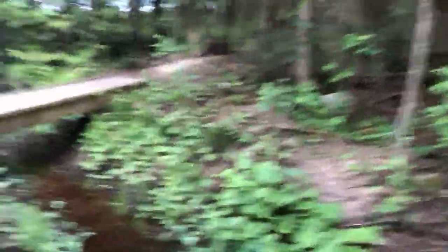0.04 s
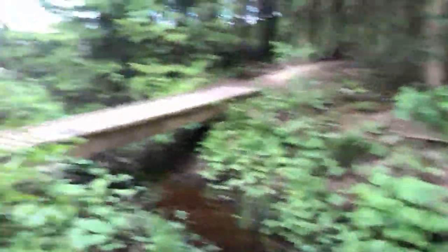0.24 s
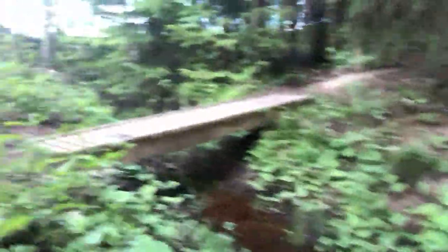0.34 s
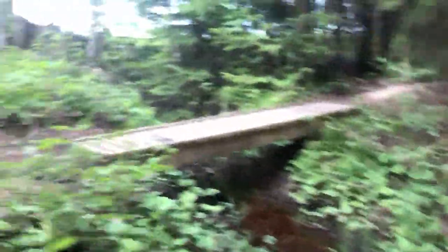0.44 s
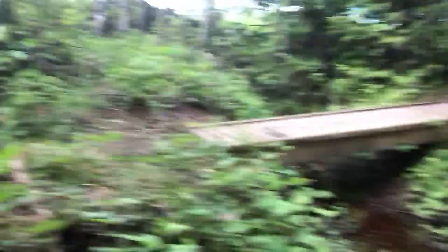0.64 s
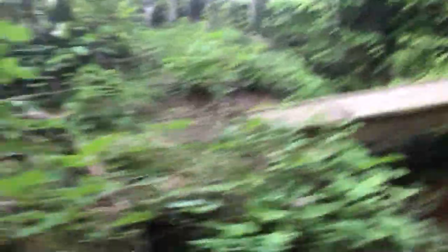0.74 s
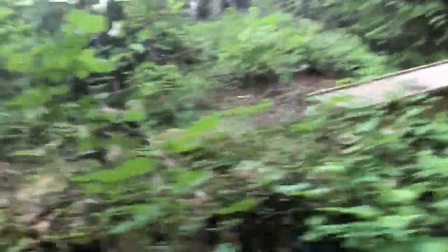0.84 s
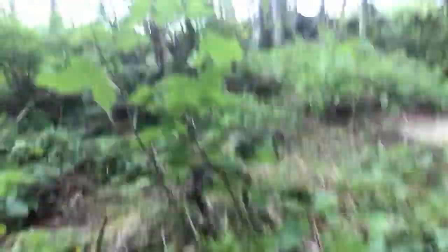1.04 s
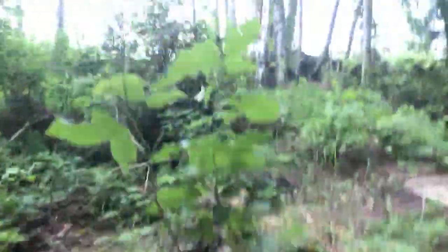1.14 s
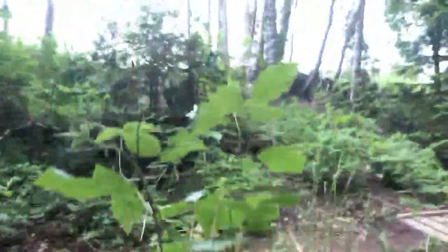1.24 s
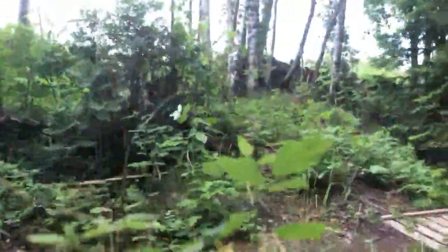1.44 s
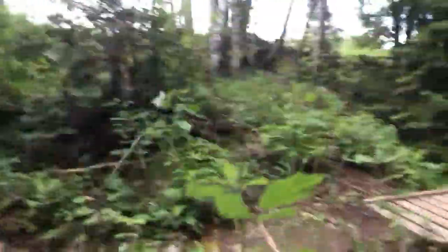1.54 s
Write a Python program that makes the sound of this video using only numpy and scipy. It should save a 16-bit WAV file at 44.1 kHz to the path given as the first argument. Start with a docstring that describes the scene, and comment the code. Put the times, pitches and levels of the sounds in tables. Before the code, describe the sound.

Foliage rustle close up: dry snaps, swishing fronds and soft bumps on a quiet forest path

```python
"""Pushing through ferns

A walker pushes quickly through ferns and undergrowth on a forest path, close to a phone microphone.
A quiet forest hush and a low rumble are shaped noise; fronds swish and rustle as patchy, crackling noise.
Soft bumps thud and bent stems knock: short waves with a falling pitch, roughened by noise.
Dry stalks and leaf edges snap as very short bursts of noise, each with its own tone colour."""
import sys
import numpy as np
from scipy import signal
from scipy.fft import rfft, irfft, next_fast_len
from scipy.io import wavfile
from scipy.ndimage import uniform_filter1d

SR = 44100
rng = np.random.default_rng(int(sys.argv[2]) if len(sys.argv) > 2 else 0)


def to_wav(sig):
    """Store sig (one row per channel, or 1-D mono) as 16-bit WAV at the path in sys.argv[1].

    Samples outside -1..1 are clipped; the rate is SR.
    """
    pcm = np.clip(np.atleast_2d(sig), -1, 1) * 32767
    pcm = np.round(pcm).astype(np.int16)
    wavfile.write(sys.argv[1], SR, pcm.T)  # frames by channels


N = 70560  # length in samples: 1.6 s

# All levels below are those of the sounds before they reach the microphone.
# A decay time is the time a sound takes to fade by 60 dB.

# Tone of the forest hush: (f/Hz, gain/dB)
HUSH_TONE = [(71, -42), (120, 4.5), (304, -5.5), (1360, -3.5), (1560, -4), (2800, -1), (4650, 0.5),
             (15000, -13.5)]
HUSH_LEVEL_DB = -65

# Low rumble of the walking body at the microphone, over time: (t/s, level/dB)
RUMBLE_LEVELS = [(0.0, -64), (0.052, -69), (0.288, -61), (0.31, -71), (0.512, -81), (0.556, -74.5),
                 (0.672, -72.5), (0.796, -66), (0.98, -69), (1.024, -59.5), (1.216, -71.5), (1.282, -58.5),
                 (1.358, -79), (1.39, -67), (1.478, -76), (1.6, -79)]
RUMBLE_HZ = 81  # the rumble gets weaker well below and above this

# Fronds dragging on the legs, over time: (t/s, treble swish level/dB, low rustle level/dB)
FROND_DRAG = [(0, -62.5, -53), (0.059, -70, -67.5), (.12, -60.5, -58.5), (.17, -55.5, -61),
              (0.194, -56.5, -51), (.225, -51.5, -58.5), (.25, -38.5, -45.5), (.29, -40, -51.5),
              (.33, -47.5, -54.5), (.385, -56, -59), (.5, -63.5, -65.5), (.55, -57, -58.5),
              (.63, -63, -64.5), (0.702, -67, -65), (0.742, -57, -51.5), (0.758, -64, -72.5),
              (0.789, -49.5, -50), (0.849, -56.5, -55.5), (.89, -48, -48), (0.961, -54.5, -62),
              (1.02, -44.5, -50), (1.068, -53.5, -51.5), (1.108, -54.5, -59), (1.139, -53, -47.5),
              (1.19, -64, -62.5), (1.251, -58.5, -57), (1.311, -53, -55), (1.366, -54, -66),
              (1.401, -51.5, -54.5), (1.47, -54.5, -63), (1.52, -63, -61), (1.6, -56, -64)]
# Tone of the treble swish: (f/Hz, gain/dB)
SWISH_TONE = [(1470, -9), (2500, -14), (3030, -6.5), (5530, -0.5), (6460, -3.5), (9060, -4), (14500, -5.5)]
# Tone of the low rustle: (f/Hz, gain/dB)
RUSTLE_TONE = [(88, -39), (150, -12), (303, -4), (525, -6), (588, -7), (867, -5.5), (1230, -9.5),
               (1600, -4), (3000, -11.5), (3900, -43), (6600, -120)]

# Soft low bumps of foot and stems: (t/s, peak level/dB, first f/Hz, decay time/s)
THUDS = [(0.084, -48.5, 262, 0.052), (0.151, -53.5, 392, 0.038), (0.244, -73, 456, 0.043),
         (0.263, -49, 157, 0.031), (0.359, -59, 403, 0.045), (0.736, -48, 386, 0.071),
         (0.774, -39, 465, 0.026), (0.864, -49, 338, 0.045), (0.935, -45, 320, 0.017),
         (0.989, -67, 390, 0.037), (1.022, -52, 388, 0.046), (1.049, -45.5, 334, 0.05),
         (1.063, -55, 293, 0.073), (1.088, -51, 414, 0.14), (1.139, -50, 256, 0.04),
         (1.209, -60, 310, 0.071), (1.283, -46.5, 362, 0.076), (1.295, -40, 238, 0.017),
         (1.384, -51, 151, 0.073), (1.449, -52, 437, 0.036), (1.528, -58, 346, 0.05),
         (1.578, -59, 188, 0.076)]
THUD_RISE_S, THUD_HALF_PITCH_S = 0.0013, 0.03
THUD_ROUGHNESS = 0.51  # noise strength beside a wave of height 1

# Knocks of bent stems: (t/s, peak level/dB, first f/Hz, time to half pitch/s, decay time/s)
STEM_KNOCKS = [(0.0849, -51, 2320, 0.0014, 0.016), (0.091, -44.5, 2440, 0.0013, 0.036),
               (0.183, -36.5, 1230, 0.022, 0.0085), (0.2354, -31, 1830, 0.018, 0.0096),
               (0.2615, -29.5, 1916.0, 0.045, 0.011), (0.271, -38, 2340, 0.0016, 0.014),
               (0.3175, -41, 2220, 0.0013, 0.017), (0.3565, -40.5, 2280, 0.0013, 0.017),
               (0.5301, -54, 2420, 0.0013, 0.015), (0.5469, -42, 2290, 0.0016, 0.016),
               (0.6762, -49.5, 2360, 0.0017, 0.018), (0.7257, -48, 2230, 0.00093, 0.026),
               (0.7343, -43.4, 2350, 0.0016, 0.0167), (0.7679, -30.5, 2270, 0.0011, 0.013),
               (0.7741, -31.5, 2350, 0.0015, 0.0085), (0.7876, -37, 2340, 0.0011, 0.014),
               (0.8059, -34.5, 2270, 0.00099, 0.014), (0.8218, -37, 2002.0, 0.023, 0.0079),
               (0.8637, -37.5, 2230, 0.00099, 0.026), (0.9234, -40, 1730, 0.026, 0.009),
               (0.9352, -44, 2290, 0.00124, 0.044), (0.9873, -40, 1894.0, 0.014, 0.018),
               (1.129, -39, 2290, 0.0011, 0.014), (1.1411, -37.5, 2310, 0.0015, 0.021),
               (1.1434, -31, 1937.0, 0.031, 0.0065), (1.2022, -46.5, 2270, 0.0011, 0.019),
               (1.2808, -32.5, 2294, 0.0019, 0.018), (1.2926, -40, 1880, 0.028, 0.0071),
               (1.3806, -50.5, 2320, 0.0014, 0.026), (1.5595, -44, 2040, 0.038, 0.0088)]
KNOCK_RISE_S = 0.00029
KNOCK_ROUGHNESS = 0.44  # noise strength beside a wave of height 1

# Stalk and leaf snaps: (t/s, peak level/dB, ring f/Hz, 3-6 kHz gain/dB, 6-10 kHz gain/dB,
# 10-16 kHz gain/dB, decay time/s)
STALK_SNAPS = [(0.0904, -39.5, 4700, 0.0, -3, -2, 0.0064), (0.1407, -48, 4130, 3, -11, -22, 0.0036),
               (0.178, -40, 7859.0, -2.8, 0.0, -7, 0.0073), (0.1825, -38.5, 5060, -1, -2.2, -5, 0.0092),
               (0.1895, -35, 7278.0, -3, -3, -2, 0.026), (0.2342, -18, 6840, -2.5, -7, 2, 0.01),
               (0.2432, -13, 12058.0, -14.8, -23, 5, 0.0031),
               (0.255, -14.5, 9200, -10.5, -3.5, 1.5, 0.0076), (0.2622, -35, 14728.0, -9, -7, 9, 0.005),
               (0.2665, -25.7, 8060, -2, -6, 1, 0.0069), (0.2724, -9, 15600, -11, -0.5, 0.0, 0.0053),
               (0.284, -26, 10680.0, -16, -2.1, 14, 0.006), (0.2877, -27.5, 10615.0, -6.7, 1, -6, 0.0066),
               (0.3156, -40, 4608.0, -8, -6, 2, 0.0066), (0.3566, -35.5, 10766.0, -5, -1.2, -6, 0.0031),
               (0.367, -40, 11240.0, -0.6, 5, -6, 0.0036), (0.405, -42.5, 6050.0, -10, -1.2, 9, 0.0032),
               (0.4313, -46.0, 9022.0, 10, -12, 4, 0.0074), (0.5481, -41.5, 3402.0, 1, 1, -8, 0.0053),
               (0.6831, -41, 13000, 1.5, 8, -4, 0.0039), (0.7253, -42.5, 5200, 2, -5, -2.3, 0.0049),
               (0.7671, -22, 13000, -3.5, 5.5, -2, 0.0053), (0.774, -44, 9582.0, -2.9, 11, -7, 0.0073),
               (0.7885, -37.9, 4900, -3, 6, -1, 0.016), (0.797, -36.5, 6373.0, -6.7, -2, -6, 0.017),
               (0.805, -44, 4435.0, 8, -5, -4, 0.0044), (0.8207, -39, 4952.0, -2, -1, 3, 0.004),
               (0.8306, -29.5, 14300, -8, -2, -3.5, 0.019), (0.8622, -30.5, 5240, 1, -9, -19, 0.0045),
               (0.8833, -33, 6826.0, -1.5, -6, 1, 0.016), (0.8857, -30, 6782.0, 5, -9, 1.5, 0.0083),
               (0.9121, -34, 5500, 0.0, 0, -10, 0.005), (0.9349, -23, 15200, -16, -7, -1, 0.0047),
               (0.9874, -19.5, 3910, 0.0, -6, 3, 0.0054), (1.0065, -21, 13500, -2.5, -6.5, -3, 0.0069),
               (1.0107, -29, 14254.0, -7.7, -7.4, 4, 0.0133), (1.0226, -32.5, 14664.0, -4, 2, -4, 0.0068),
               (1.0283, -30, 3919.0, -2, -12, 2.5, 0.016), (1.089, -47, 9173.0, -1.8, 4, -11, 0.004),
               (1.1261, -29, 4198.0, -2, -5, 5, 0.004), (1.13, -33, 4940, -4, 6, 1, 0.0044),
               (1.1438, -29.5, 4030, -2, -4.5, -4, 0.0043), (1.2244, -44, 4400, 0.0, 0, -4, 0.026),
               (1.2484, -38.3, 4700, -1, -16, -7, 0.0097), (1.2661, -41, 11300, -2.3, -3, 6, 0.0034),
               (1.2705, -35, 6675.0, -18, 8, -5, 0.0078), (1.2795, -36.5, 5146.0, -5, -1, -5, 0.0064),
               (1.2927, -29.5, 9280.0, -5.5, 2, 0, 0.0051), (1.3095, -29.5, 9000, -10, 2, -7, 0.0039),
               (1.313, -37, 15245.0, -9, 3, 1, 0.032), (1.333, -26, 7400, -7, 1.5, -19, 0.0013)]
SNAP_RISE_S = 0.000076
RING_ADDED_DB, RING_WIDTH = 4, 0.044  # boost added on top of the plain tone; width as a share of ring Hz
TAIL_DB, TAIL_DECAY_S = -17.5, 0.042  # tail start compared with the burst

# Microphone: bass cut, dip in the upper middle, upper limit
LOW_CUT_HZ, TOP_HZ = 48, 15780
DIP_HZ, DIP_WIDTH_HZ, DIP_DB = 2800, 224, -2.5


def amp(db):
    """Turn decibels into a plain multiplier."""
    return 10 ** (np.asarray(db) / 20)


def unit(x):
    """Scale a signal to an average (RMS) strength of 1."""
    return x / np.sqrt(np.mean(x ** 2) + 1e-20)


def along(points, hz):
    """Read a curve between (Hz, value) points, with pitch on a log axis."""
    f, value = np.transpose(points)
    return np.interp(np.log(hz + 1), np.log(f + 1), value)


def filtered(x, response):
    """Make each frequency of x stronger or weaker by response(frequency)."""
    size = next_fast_len(x.shape[-1] + 4096)
    spectrum = rfft(x, size) * response(np.fft.rfftfreq(size, 1 / SR))
    return irfft(spectrum, size)[..., :x.shape[-1]]


def toned(x, tone):
    """Colour x by a table of (Hz, dB) points, then scale it to strength 1."""
    return unit(filtered(x, lambda f: amp(along(tone, f))))


def level_over_time(times, db):
    """Draw a smooth run of multipliers through levels at given times."""
    return amp(np.interp(np.arange(N) / SR, times, db))


def add(track, start_s, sound):
    """Mix a sound into the track at a start time, cutting it at the track's end."""
    part = track[round(start_s * SR):][:len(sound)]
    part += sound[:len(part)]


def patchy(depth_db):
    """White noise whose strength varies at random in patches of time and pitch."""
    z = signal.stft(rng.standard_normal(N), nperseg=256)[2]
    field = rng.standard_normal(z.shape)
    field = uniform_filter1d(field, 6, 0)  # smooth across pitch
    field = uniform_filter1d(field, 5, 1)  # smooth across time
    patches = z * amp(depth_db * unit(field))
    return unit(signal.istft(patches, nperseg=256)[1][:N])


def crackle(count, spread_db, decay_s):
    """Noise let through by many tiny scattered breaks; a spread of 0 makes them all equal."""
    when, chance = rng.random((count, 2)).T
    size = amp(-spread_db * np.log(chance + 0.03))  # a few large, many small
    hits = np.bincount((when * N).astype(int), size, N)
    fade = amp(-60 * np.arange(SR // 20) / SR / decay_s)
    gate = signal.fftconvolve(hits, fade)[:N]
    return unit(gate * rng.standard_normal(N))


def falling(t, hz, half_s, roughness):
    """A wave whose pitch halves after half_s, plus steady noise strongest a little below its first pitch."""
    wave = np.sin(2 * np.pi * hz * half_s * np.log(1 + t / half_s))
    noise = filtered(rng.standard_normal(len(t)), lambda f: f / hz / (1 + (f / hz) ** 4))
    return wave + roughness * unit(noise)


def hush():
    """The steady forest air: soft patchy noise at a fixed level."""
    return amp(HUSH_LEVEL_DB) * toned(patchy(depth_db=2.5), HUSH_TONE)


def rumble():
    """Lumpy low noise around one broad band."""
    times, db = np.transpose(RUMBLE_LEVELS)
    low = filtered(patchy(depth_db=1.0), lambda f: f / RUMBLE_HZ / (1 + (f / RUMBLE_HZ) ** 3))
    return level_over_time(times, db) * unit(low)


def fronds():
    """Rubbing noise and small crackles follow the drag of the plants."""
    times, swish_db, rustle_db = np.transpose(FROND_DRAG)
    high = patchy(depth_db=4.0) + 0.5 * crackle(count=900, spread_db=5.5, decay_s=0.009)
    low = patchy(depth_db=2.0) + 0.75 * crackle(count=400, spread_db=0.0, decay_s=0.014)
    swish = level_over_time(times, swish_db) * toned(high, SWISH_TONE)
    rustle = level_over_time(times, rustle_db) * toned(low, RUSTLE_TONE)
    return swish + rustle


def thuds():
    """Soft contacts give a few low cycles that sag in pitch as they fade."""
    out, t = np.zeros(N), np.arange(SR // 5) / SR
    for start_s, db, hz, decay_s in THUDS:
        shape = (1 - np.exp(-t / THUD_RISE_S)) * amp(-60 * t / decay_s)
        wave = falling(t, hz, THUD_HALF_PITCH_S, THUD_ROUGHNESS)
        add(out, start_s, amp(db) * shape / shape.max() * wave)
    return out


def knocks():
    """A bending wave in a stem: the high part arrives first, so the pitch falls."""
    out, t = np.zeros(N), np.arange(SR // 10) / SR
    for start_s, db, hz, half_s, decay_s in STEM_KNOCKS:
        shape = (1 - np.exp(-t / KNOCK_RISE_S)) * amp(-60 * t / decay_s)
        wave = falling(t, hz, half_s, KNOCK_ROUGHNESS)
        add(out, start_s, amp(db) * shape / shape.max() * wave)
    return out


def snap_noise(length, ring_hz, low_db, mid_db, top_db):
    """Noise coloured by one stalk, which rings most strongly around its own pitch."""
    tone = [(1800, low_db - 21), (4200, low_db), (8000, mid_db), (13000, top_db)]

    def response(f):
        ring = amp(RING_ADDED_DB) / (1 + ((f / ring_hz - 1) / RING_WIDTH) ** 2)
        return amp(along(tone, f)) * (1 + ring)

    return filtered(rng.standard_normal(length), response)


def snaps():
    """Each break is a sharp noise burst with a weaker tail, coloured by its own stalk."""
    out, t = np.zeros(N), np.arange(SR // 10) / SR
    for start_s, db, ring_hz, low_db, mid_db, top_db, decay_s in STALK_SNAPS:
        burst = amp(-60 * t / decay_s)
        tail = amp(TAIL_DB - 60 * t / TAIL_DECAY_S)
        shape = (1 - np.exp(-t / SNAP_RISE_S)) * (burst + tail)
        noise = snap_noise(len(t), ring_hz, low_db, mid_db, top_db)
        # Even out the noise strength, counting most where the snap is loud.
        noise /= np.sqrt(np.sum((noise * shape) ** 2) / np.sum(shape ** 2))
        add(out, start_s, amp(db) * shape / shape.max() * noise)
    return out


def scene():
    """Add all the layers, from the background to the snaps, in one channel."""
    return (hush() + rumble() + fronds() + thuds() + knocks() + snaps())[None]


def record(dry):
    """The phone cuts the deepest bass, dips in the upper middle and keeps nothing above its limit."""
    def microphone(f):
        bass_cut = 1 / np.sqrt(1 + (LOW_CUT_HZ / (f + 1)) ** 8)
        dip = amp(DIP_DB / (1 + ((f - DIP_HZ) / DIP_WIDTH_HZ) ** 2))
        return (f < TOP_HZ) * dip * bass_cut

    return filtered(dry, microphone)


dry = scene()
out = record(dry)
to_wav(out)
```